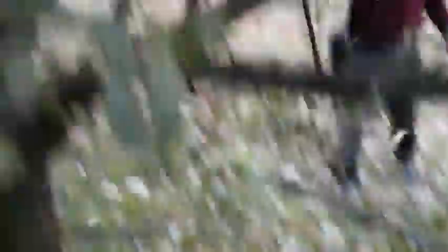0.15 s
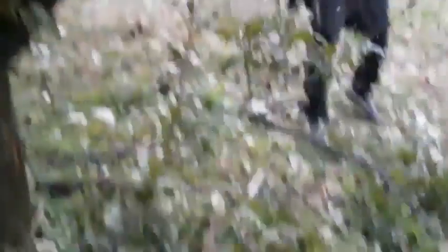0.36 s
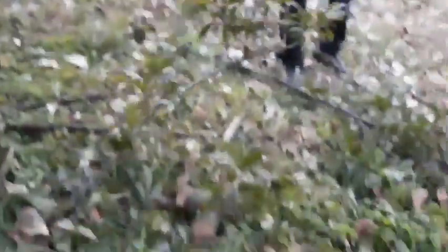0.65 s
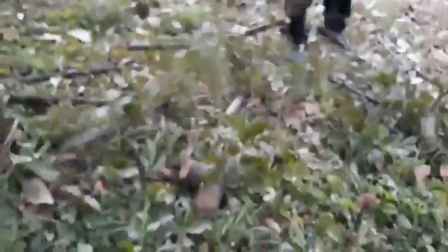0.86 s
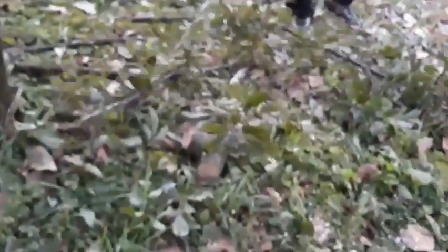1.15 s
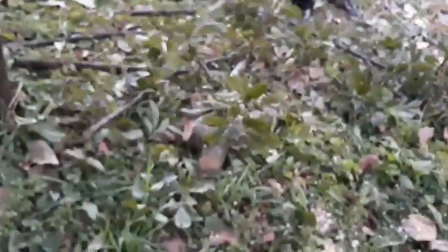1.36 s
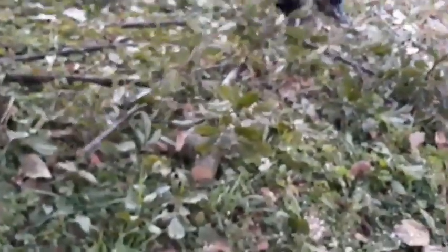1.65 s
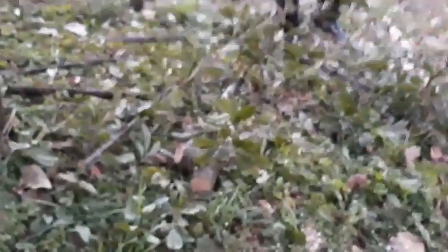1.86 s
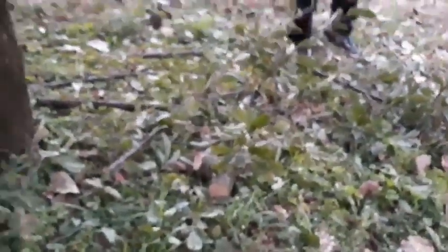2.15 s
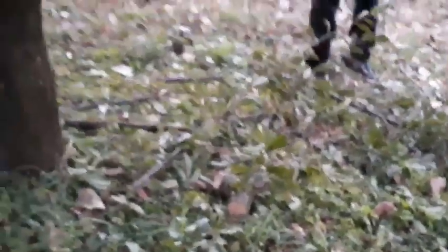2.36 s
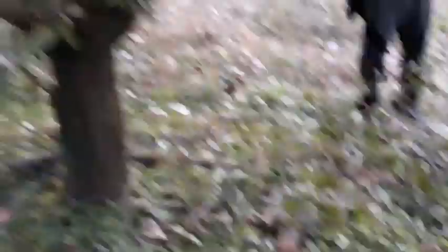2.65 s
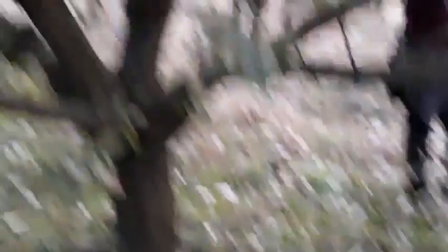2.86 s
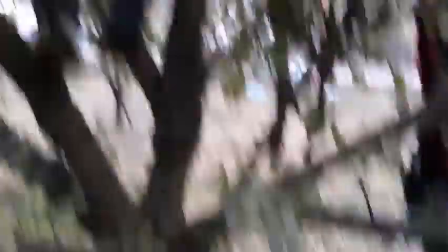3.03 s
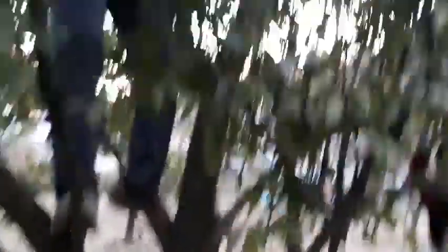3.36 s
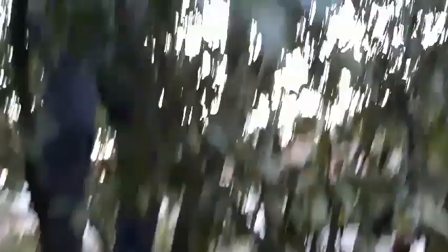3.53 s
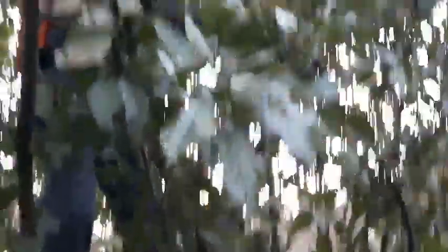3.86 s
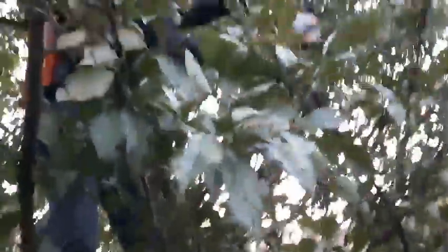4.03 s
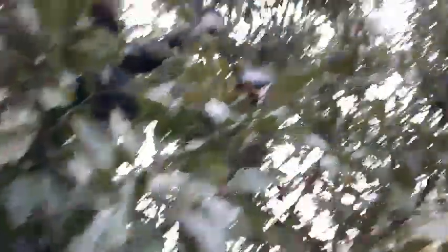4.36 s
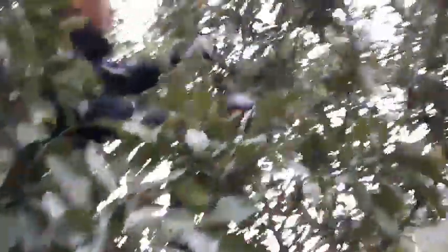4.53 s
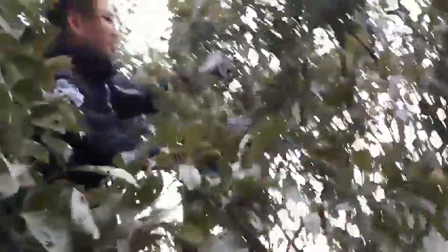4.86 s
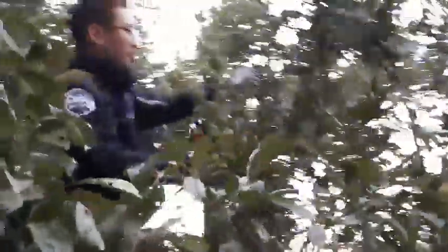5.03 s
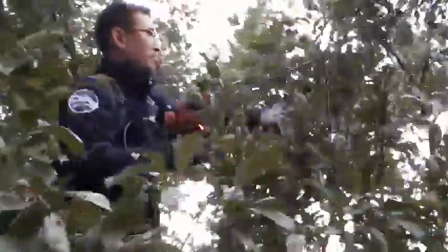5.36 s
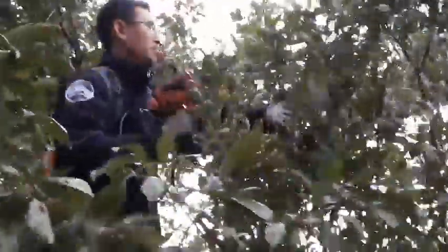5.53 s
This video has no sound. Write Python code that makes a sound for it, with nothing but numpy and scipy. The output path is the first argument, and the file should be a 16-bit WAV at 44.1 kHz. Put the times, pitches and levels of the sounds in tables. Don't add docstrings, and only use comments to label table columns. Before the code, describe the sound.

Two runs of a small battery-type chain saw outdoors, heard through a phone with centred, mono sound. Each begins with a hard trigger clack and climbing gear whine, roughens into tearing wood, then runs free and drops in pitch to a brake clack. Between them come leaf rustle, dry twig snaps, dull handling thumps and soft wind with a distant engine hum.

```python
import sys
import numpy as np
from scipy import signal
from scipy.fft import rfft, irfft
from scipy.io import wavfile
from scipy.ndimage import uniform_filter1d

SR = 44100
rng = np.random.default_rng(int(sys.argv[2]) if len(sys.argv) > 2 else 0)


def transcribe(u):
    v = np.clip(np.atleast_2d(u).T, -1, 1)
    q = np.round(v * 32767).astype(np.int16)
    wavfile.write(sys.argv[1], SR, q)


def field_ratio(decibels):
    return 10 ** (np.asarray(decibels, dtype=float) / 20)


N = 251370
T = np.arange(N) / SR

# time in seconds, wind level in dB, engine level in dB.
FAR_LEVELS = [(0.0, -47.5, -54.5), (1.52, -50, -52), (2.19, -56, -61), (2.7, -53, -54), (3.98, -51.5, -52),
              (4.25, -53.5, -47), (5.7, -58, -49)]
# frequency in Hz, level in dB per Hz.
WIND_COLOUR = [(12, -72), (20, -51), (70, 4), (111, -4), (141, -1.5), (181, -10), (206, 0.5), (255, -8.5),
               (387, -7), (424, -7), (1500, -15), (1950, -50.5), (3300, -120)]
# frequency in Hz, level in dB.
ENGINE_HUM = [(71, -69), (88, -57), (215, -60), (328, -58), (484, -63)]
# frequency in Hz, level in dB over the engine level.
ENGINE_DRONE = [(145, -4.5), (393, -4.5)]

# frequency in Hz, level in dB per Hz.
LEAF_COLOUR = [(290, -28), (500, 2.5), (943, -10.5), (1140, -8), (1260, -6.5), (1860, -6.5), (2660, 0.5),
               (5320, 4.5), (6800, 0), (8570, -4), (10200, -12.5), (14200, -3.5), (15700, -11)]
# time in seconds, rustle in dB, nearness as dB of the finest crackle over it.
LEAF_STIR = [(0.0, -41, -16), (0.136, -47.5, -11), (1.87, -42, -11), (2.266, -47.5, -9),
             (2.476, -53.5, -5.5), (2.726, -55, -4), (2.88, -52, -1), (2.93, -42, -5), (3.05, -47, -3.5),
             (3.3, -44, 0), (3.4, -40.5, -3.5), (3.5, -46, -3), (5.13, -41.5, -6), (5.32, -44, -4),
             (5.41, -48, -5), (5.445, -42, 0), (5.504, -47, -4), (5.7, -48.5, -4.5)]
# peak in seconds, swell in dB, fade in seconds.
BRANCH_SAG = (2.1, 4.2, 0.27)
DULL_SHARE, DULL_AT_DB, DULL_DB = 0.83, -53.5, -6
HOLLOW_DB = -13.5

# start in seconds, peak in dB, pitch in Hz, t60 of the rustling tail in seconds.
TWIG_TICKS = [(0.016, -38, 7000, .03), (0.028, -40, 9500, 0.034), (0.037, -28, 4500, 0.027),
              (0.057, -42, 13500, .02), (0.071, -27.5, 4620, 0.056), (0.085, -35, 6500, .03),
              (0.113, -42, 7000, .03), (0.1232, -31, 5330, .06), (1.925, -33, 5000, 0.055),
              (2.02, -31, 5060, 0.066), (2.1718, -32, 5450, .07), (2.193, -35, 1700, .06),
              (2.25, -38, 2500, .04), (2.3594, -36, 6240, .05), (2.375, -34, 4950, .07),
              (2.398, -39, 3200, .05), (2.4339, -30.5, 5800, .06), (2.5882, -41, 5590, .03),
              (2.5995, -30, 4900, 0.044), (2.6367, -34, 5140, 0.036), (2.6968, -35, 5300, 0.18),
              (2.731, -37, 2200, 0.033), (2.7905, -40, 4670, 0.066), (2.8306, -39, 5320, .04),
              (2.909, -35, 4700, .08), (2.9594, -32, 4930, .06), (3.0494, -38, 4980, .06),
              (3.065, -37, 8500, .04), (3.087, -41, 1500, .03), (3.131, -35, 4620, 0.071),
              (3.1514, -28, 5440, .08), (3.249, -24.5, 5300, 0.1), (3.29, -26, 8480, .05),
              (3.3656, -26.5, 5300, 0.096), (3.382, -31, 6000, .04), (3.39, -26, 8700, 0.17),
              (3.42, -24, 7700, 0.092), (3.606, -30, 5470, .04), (5.249, -25, 5060, 0.16),
              (5.441, -23, 3600, 0.047), (5.443, -20, 7000, 0.061), (5.628, -34, 5540, 0.055),
              (5.656, -37, 4950, .06)]
# start in seconds, peak in dB,
# pitch in Hz.
DULL_KNOCKS = [(0.065, -28, 700), (0.799, -31, 310), (2.091, -28, 480), (2.592, -29, 245),
               (2.698, -30.5, 151), (2.87, -37, 153), (3.089, -26.5, 149), (3.235, -25, 358),
               (3.251, -31, 218), (3.317, -34, 326), (3.357, -41, 215), (5.094, -26.5, 775)]
# frequency in Hz, level in dB.
MIC_COLOUR = [(300, 1), (1000, 3.5), (5000, 10), (8000, 10), (10000, -0.5), (13000, 15.5), (15700, -11)]
DELAY_S = 0.00062

# start in seconds, peak in dB, body pitch in Hz.
SWITCH_CLACKS = [(0.1445, -18, 3220), (0.149, -13, 2140), (0.157, -4, 6000), (0.163, -5.5, 1860),
                 (0.166, -20.5, 4400), (0.175, -13, 3720), (0.192, -18, 5630), (1.8325, -6.5, 6540),
                 (1.8335, -12.5, 2450), (1.8361, -9.5, 3500), (1.836, -26, 5160), (3.640, -14, 5000),
                 (3.649, -21, 3430), (3.65, -9.5, 3200), (3.6563, -5.5, 3420), (3.679, -12, 3970),
                 (5.093, -3, 3680), (5.0945, -22, 1800), (5.097, -7, 3800)]
# start in seconds, peak in dB.
HIGH_SPRING = [(0.162, -35), (0.169, -35), (0.1774, -36), (0.195, -38), (1.8367, -35), (1.8424, -35),
               (1.8534, -40), (3.6516, -25), (3.6616, -19), (3.6784, -33), (5.1004, -31), (5.1134, -32)]
# start in seconds, peak in dB.
LOW_SPRING_HITS = [
    (3.6591, -19),
    (5.0995, -22),
]
# frequency in Hz, level in dB.
BODY_COLOUR = [(300, -6.5), (800, -1), (2000, -4), (6500, -6.5), (8500, -9.5), (10000, -17), (15700, -12)]
CLACK_T60_S = 0.03
SPRING_HZ, SPRING_T60_S, LOW_SPRING_HZ, LOW_SPRING_T60_S = 12650, 0.047, 8700, 0.048

# start in seconds, peak in dB, pitch in Hz.
LINK_SLAPS = [(.8857, -15, 2300), (.9166, -15, 2420), (.9884, -13, 2260), (1.0418, -10, 2150),
              (1.066, -9, 2290), (1.0992, -9, 2320), (1.1346, -11, 2300), (1.3344, -10, 3110),
              (1.389, -10, 2240), (1.4354, -12, 2900), (1.45, -8, 3030)]
SLAP_T60_S = 0.033

# on in seconds, off in seconds.
MOTOR_RUNS = [
    (.156, 1.842),
    (3.647, 5.102),
]
# in at seconds, out at seconds, bite time in seconds.
TEETH_IN_WOOD = [
    (0.841, 1.489, 0.029),
    (4.229, 4.735, 0.107),
]
# time in seconds, gear mesh in Hz.
MOTOR_SPEEDS = [
    [(.16, 397.8), (.42, 818), (.80, 819), (.87, 793.5), (1.2, 803.6), (1.445, 796), (1.47, 850.5),
     (1.62, 831), (1.84, 400)],
    [(3.66, 299.3), (3.725, 520), (3.896, 818), (4.21, 820), (4.3, 789), (4.45, 837), (4.7, 846),
     (4.895, 821), (5.095, 392)],
]
# time in seconds, chain rattle in dB.
CHAIN_EFFORTS = [
    [(.2, -26.5), (.43, -20), (.528, -22), (.746, -21.5), (.936, -17.5), (1.446, -17), (1.654, -24),
     (1.81, -29), (1.84, -32)],
    [(3.69, -31), (3.704, -26.5), (3.876, -20.5), (3.98, -21.5), (4.2, -20.5), (4.66, -20), (4.734, -22),
     (4.97, -22.5), (5.085, -27.5)],
]
# dB over the chain rattle on reaching speed, at first touch, in the wood, after it.
LAYER_LEVELS = [
    [(-8.5, -6, -6, -8.5), (-2, 0, 2.5, -2), (-9, -7.5, -11.5, -7)],
    [(-12, -9, -6.5, -11.5), (0.5, -1, 0, -3), (0.5, 1.5, -3, -5.5)],
]
LAYER_EDGES = (130, 1200, 3200, 8900, 15700)
# frequency in Hz, level in dB per Hz.
FREE_COLOUR = [
    [(76, -55), (130, -84), (562, -16), (744, -9.5), (823, -13), (1090, -14), (1630, 6), (2290, 17.5),
     (2480, 14.5), (3030, 0.5), (5000, 5), (7470, -0.5), (9700, -22.5), (13400, -15), (15700, -25)],
    [(76, -51), (130, -22), (551, -15.5), (807, -8.5), (1310, -15.5), (1600, -7.5), (2160, -5),
     (2380, -5.5), (3280, -3.5), (5000, 8.5), (6900, 2), (8260, -1), (9900, -15), (13900, -5.5),
     (15700, -15)],
]
# frequency in Hz, level in dB per Hz.
CUT_COLOUR = [
    [(76, -52), (130, -23), (296, -27), (392, -13.5), (440, -19.5), (585, -13), (701, -9), (1110, -10),
     (2430, 3.5), (2740, -9), (4010, -7), (7630, -4), (10100, -21), (13400, -11), (15700, -21)],
    [(76, -50), (130, -12), (302, -7), (400, -4.5), (540, -11), (775, -0.5), (1160, -12), (1250, -15.5),
     (1730, -9.5), (2910, -10), (5110, 11.5), (8260, 1.5), (10100, -10.5), (13400, 0.5), (15700, -11)],
]
# frequency in Hz, width in Hz, dB over the colour.
FREE_MODES = [
    [(1880, 180, 9.5), (2620, 46, 2), (3940, 110, 4), (5100, 240, 4), (8200, 280, 1)],
    [(3710, 260, 8.5), (5450, 180, 2), (8480, 83, 5.5), (11400, 1700, 5.5)],
]
# frequency in Hz, width in Hz, dB over the colour.
CUT_MODES = [
    [(400, 26, 12.7), (708, 94, 9.3), (1420, 48, 5.4), (2160, 50, 2.1), (2950, 280, 5.2), (4014, 100, 8),
     (4950, 1800, 5.3), (6300, 310, 4.3), (6900, 60, 2)],
    [(398, 20, 10), (740, 140, 4.9), (1150, 34, 11), (1850, 54, 5.2), (2460, 46, 4.1), (3720, 55, 2.6),
     (4570, 110, 0.67), (5650, 190, 3.8), (7750, 690, 2.9)],
]
# frequency in Hz, width in Hz, dB over the colour.
COAST_MODES = [
    [(1910, 230, 8), (2540, 60, 10), (4100, 65, 6.5), (4500, 140, 1), (5530, 35, 1), (7000, 44, -6),
     (7700, 73, 3)],
    [(4556, 52, -3), (5400, 52, 8.5), (5830, 41, 6), (6560, 140, 4), (7800, 130, 7), (11700, 1500, 4)],
]
# time in seconds, mesh in dB, 2nd in dB, 3rd in dB, high multiples in dB.
GEAR_TONES = [
    [(.42, -31, -31, -24.5, -28.5), (.5, -30, -29.5, -26.5, -29), (.64, -31.5, -34, -31.5, -35.5),
     (.8, -32, -39, -25.5, -44), (.84, -42, -34, -27, -31), (1.0, -33.5, -36, -25.5, -32),
     (1.44, -36.5, -38, -27, -30), (1.47, -30, -36, -35, -46), (1.62, -34, -31, -25.5, -27)],
    [(3.9, -35, -25.5, -28.5, -35.5), (4.09, -52, -32.5, -29.5, -40), (4.13, -42, -31, -38, -41),
     (4.22, -36, -30, -45, -40), (4.25, -39.5, -37, -30, -38), (4.68, -43, -36, -40, -35),
     (4.72, -38, -43, -41, -41), (4.8, -41.5, -49, -40, -32), (4.88, -37, -44, -31.5, -36)],
]
# multiple of the mesh, level in dB.
HIGH_MULTIPLES = [
    [(5, -9), (5.5, -5), (6, 4), (7, -23), (8, -7), (9, -8)],
    [(4.5, -23), (5.5, -1), (6, 7), (7, 2.5), (8, -1), (10, -14)],
]
# multiple, dB at full speed.
PULL_HALF = [
    (2.5, -33.5),
    (2.5, -33.5),
]
# frequency in Hz, width in Hz, gain in dB, loss of the 2nd in dB, loss of the 3rd in dB.
HOUSING_SONG = [
    (630, 60, 2, 2.5, 3),
    (613, 153, 10.5, 5.5, 6.5),
]
# frequency in Hz, width in Hz, gain in dB.
GLIDE_MODES = [(480, 100, -6), (700, 96, 1.5), (1000, 83, -2), (1120, 46, 3), (1330, 38, 4),
               (1500, 77, -12), (1900, 80, 4.5), (2360, 90, 2.5)]
# time in seconds, jolt of wood and bar in dB, jolt of chain and fan in dB.
GRAIN_SNAGS = [(.884, -0.5, -3), (.961, 0, -1), (1.045, 3.5, 3), (1.145, 1, 2), (1.238, 0, 4),
               (1.283, 1.5, 1), (1.335, 0, 2.5), (1.41, 1.5, 2), (1.452, -1, -0.5), (4.275, -1, 4.5),
               (4.303, 5, 5), (4.365, -0.5, 2), (4.392, 3.5, 8.5), (4.468, 1.5, 4.5), (4.52, 1.5, 3),
               (4.55, -1, 4), (4.58, 1.5, 5.5), (4.62, 2, 3), (4.655, -0.5, 3), (4.685, 1.5, 5.5)]
SNAG_RISE_S, SNAG_FALL_S = 0.014, 0.012
SNAG_SHARES = (2.1, 1.7, 0.65, 0.6)
FULL_HZ = 820
PULL_DB_PER_OCT, COAST_DB_PER_OCT, HIGH_DB_PER_OCT, FAN_DB_PER_OCT = 15, 17.5, 21, 7.5
CHIPS_PER_S, CHIP_DB, CHIP_WOOD_DB = 260, -16.5, 1


def unit(x):
    return x / np.sqrt(np.mean(x ** 2))


def read(curve):
    s, *columns = np.transpose(curve)
    return [np.interp(T, s, c) for c in columns]


def ramp(start, stop, rise):
    return np.clip(np.minimum(T - start, stop - T) / rise, 0, 1)


def add(out, s, sound):
    i = int(s * SR)
    out[i:i + len(sound)] += sound[:N - i]


def bell(hz, centre, width):
    return np.exp(-((hz - centre) / width) ** 2)


def colour(x, spectrum, rings=(), band=(0, 1e5)):
    hz = np.arange(1, N // 2 + 2) * SR / N
    points = np.array(spectrum)
    db = np.interp(np.log(hz), np.log(points[:, 0]), points[:, 1])
    db = db + sum(g / (1 + (2 * (hz - f) / w) ** 2) for f, w, g in rings)
    edges = 1 / np.sqrt((1 + (band[0] / hz) ** 16) * (1 + (hz / band[1]) ** 16))
    return irfft(rfft(x) * field_ratio(db) * edges, N)


def walk(rate):
    k = int(SR / rate)
    held = np.repeat(rng.standard_normal(N // 20), k)[:N]
    return unit(uniform_filter1d(uniform_filter1d(held, k), k))


def grains(rate, spread_db):
    sizes = field_ratio(spread_db * rng.exponential(size=N // 4).clip(0, 5))
    held = sizes[(T * rate).astype(int)]
    return unit(rng.standard_normal(N) * uniform_filter1d(held, int(SR / rate)))


def ring(hz, t60, length=.12):
    t = T[:int(length * SR)]
    return np.sin(2 * np.pi * hz * t) * 1000. ** (-t / t60)


def crack(hz, t60, width):
    edges = np.clip([hz / (1 + width), hz * (1 + width)], 30, .45 * SR)
    t = T[:int(.12 * SR)]
    push = rng.standard_normal(len(t)) * 1000. ** (-t / t60)
    push[0] += 4.
    burst = signal.sosfilt(signal.butter(1, edges, "band", fs=SR, output="sos"), push)
    return burst / np.abs(burst).max()


def waver(lines, swing_db, drift):
    out = np.zeros(N)
    for hz, db in lines:
        turns = hz * np.cumsum(1 + drift * walk(9)) / SR
        out += field_ratio(db + swing_db * walk(5.7)) * np.sin(2 * np.pi * turns)
    return out


def patchy(x, depth_db, rate):
    thirds = 3 * np.log2(np.arange(1, N // 2 + 2) * SR / N / 250).clip(0, 6)
    spectrum = rfft(x)
    out = np.zeros(N)
    for k in range(19):
        band = irfft(spectrum * np.clip(1 - np.abs(thirds - k), 0, 1), N)
        out += band * field_ratio(depth_db * walk(rate))
    return out


def far():
    wind_db, engine_db = read(FAR_LEVELS)
    wind = unit(colour(rng.standard_normal(N), WIND_COLOUR, band=(42, 1200)))
    wind = wind * field_ratio(wind_db + 4.5 + walk(4.6))
    return wind + waver(ENGINE_HUM, 0.53, 0.027) + field_ratio(engine_db) * waver(ENGINE_DRONE, 0.46, 0.01493)


def leaves():
    db, top_db = read(LEAF_STIR)
    sag_s, sag_db, fade_s = BRANCH_SAG
    sag = sag_db * (T > sag_s) * bell(T, sag_s, fade_s)
    low_db = DULL_DB - (1 - DULL_SHARE) * (db - DULL_AT_DB) + sag
    crackle = grains(900, 1.46) * field_ratio(0.24 * walk(31.9))

    def part(lo, hi, level_db):
        return unit(colour(crackle, LEAF_COLOUR, band=(lo, hi))) * field_ratio(level_db)

    low = part(600, 2100, low_db + 2.4 * walk(22.41))
    middle = part(2100, 3900, HOLLOW_DB + 0.77 * walk(5.4))
    high = part(3900, 8000, 0.86 * walk(25.58))
    top = part(8000, 15700, top_db + 0.78 * walk(5.2))
    return field_ratio(db) * (low + middle + high + top)


def twigs():
    out = np.zeros(N)
    for s, db, hz, t60 in TWIG_TICKS:
        snap = 0.33 * ring(hz, 0.0088) + 0.24 * crack(hz, 0.007, 2.8)
        add(out, s + DELAY_S, field_ratio(db) * (snap + 0.35 * crack(hz, t60, 0.43)))
    return colour(out, MIC_COLOUR)


def knocks():
    out = np.zeros(N)
    for s, db, hz in DULL_KNOCKS:
        add(out, s, field_ratio(db) * (1.33 * ring(hz, 0.017) + 0.47 * crack(1400, 0.022, 0.38)))
    return out


def clacks():
    blows, springs = np.zeros(N), np.zeros(N)
    for s, db, hz in SWITCH_CLACKS:
        body = crack(3150, CLACK_T60_S, 1.0) + 0.46 * ring(hz, CLACK_T60_S) + 0.16 * ring(690, 0.022)
        scatter = 0.43 * crack(3300, 0.11, 0.82)
        add(blows, s + DELAY_S, field_ratio(db) * (body + scatter))
    high = (HIGH_SPRING, SPRING_HZ, SPRING_T60_S)
    low = (LOW_SPRING_HITS, LOW_SPRING_HZ, LOW_SPRING_T60_S)
    for table, hz, t60 in (high, low):
        for s, db in table:
            add(springs, s, field_ratio(db) * (crack(hz, t60, 0.0043) + 0.65 * ring(hz, 1.5 * t60)))
    return colour(blows, BODY_COLOUR) + springs


def slaps():
    out = np.zeros(N)
    for s, db, hz in LINK_SLAPS:
        add(out, s + DELAY_S, field_ratio(db) * (0.82 * ring(hz, SLAP_T60_S) + 0.49 * crack(hz, 0.008, 1.5)))
    return out


def chips():
    hit = rng.random(N) < CHIPS_PER_S / SR
    return unit(colour(hit * rng.standard_normal(N), MIC_COLOUR, band=(1500, 15700)))


def jolts():
    snags = np.array(GRAIN_SNAGS)
    since = T - snags[:, :1]
    swell = np.clip(1 + since / SNAG_RISE_S, 0, 1) * np.exp(-since.clip(0) / SNAG_FALL_S)
    low, high = snags[:, 1:].T @ swell
    return low, low, high, high


def gear_whine(hz, wood, after, mesh, housing, high_mesh, half_mesh):
    slow = np.log2(hz / FULL_HZ)
    gliding = np.clip(np.abs(np.gradient(hz)) * SR / 1500, 0, 1)
    tremble = (0.0017 + 0.002 * wood + 0.011 * gliding) * walk(150) + 0.00596 * wood * walk(25)
    turn = 2 * np.pi * np.cumsum(hz * (1 + tremble)) / SR

    *low_db, high_db = read(mesh)
    speed_loss = np.where(after, COAST_DB_PER_OCT, PULL_DB_PER_OCT) * slow
    first_db, second_db, third_db = [db + speed_loss for db in low_db]
    song_hz, song_width, song_db, second_loss, third_loss = housing
    partials = [(1, first_db + song_db * bell(hz, song_hz, song_width)),
                (2, second_db - second_loss * gliding), (3, third_db - third_loss * gliding)]
    high_db = high_db + HIGH_DB_PER_OCT * slow - 5 * wood - 12 * gliding
    partials += [(k, high_db + db + 3 * walk(45)) for k, db in high_mesh]
    half, half_db = half_mesh
    partials.append((half, half_db + 12 * slow - 9 * (1 - gliding) - 6 * after))

    out = np.zeros(N)
    for k, db in partials:
        passing = gliding * sum(g * bell(k * hz, f, w) for f, w, g in GLIDE_MODES)
        flutter = (1.5 + 1.1 * wood + 1.2 * gliding) * walk(60)
        out += field_ratio(db + passing + flutter) * np.sqrt(2) * np.sin(k * turn)
    return out


def chain_rattle(hz, wood, after, chain_db, layers, at_speed_s, touch_s,
                 free, cut, free_rings, cut_rings, coast_rings):
    def stage(row):
        before = np.interp(T, (at_speed_s, touch_s), row[:2])
        return wood * row[2] + (1 - wood) * np.where(after, row[3], before)

    wood_db, bar_db, fan_db = map(stage, layers)
    fan_db = fan_db + FAN_DB_PER_OCT * np.log2(hz / FULL_HZ)
    levels = (wood_db - 6.0, bar_db - 5.0, 0., fan_db)
    links, teeth = grains(1600, 0.63), grains(400, 0.37)
    judder = field_ratio(0.14 * walk(14) * (-2.5 + wood))
    rattle = field_ratio(chain_db + CHIP_DB + CHIP_WOOD_DB * wood) * chips()
    bands = zip(LAYER_EDGES, LAYER_EDGES[1:])
    for band, db, share, jolt_db in zip(bands, levels, SNAG_SHARES, jolts()):
        coasting = unit(colour(links, free, coast_rings, band))
        pulling = unit(colour(links, free, free_rings, band))
        running = np.where(after, coasting, pulling)
        tearing = unit(colour(teeth, cut, cut_rings, band))
        mix = np.sqrt(1 - wood) * running + np.sqrt(wood) * tearing
        rattle = rattle + field_ratio(chain_db + db + share * jolt_db) * mix
    return judder * patchy(rattle, 0.87 + 0.079 * wood, 80)


def saw(power, speed, effort, layers, mesh, housing, bite, free, cut,
        free_rings, cut_rings, coast_rings, high_mesh, half_mesh):
    (hz,), (chain_db,) = read(speed), read(effort)
    wood = ramp(*bite)
    after = T > (bite[0] + bite[1]) / 2
    gears = gear_whine(hz, wood, after, mesh, housing, high_mesh, half_mesh)
    chain = chain_rattle(hz, wood, after, chain_db, layers, speed[1][0], bite[0],
                         free, cut, free_rings, cut_rings, coast_rings)
    grab = field_ratio(0.21 * wood * walk(130))
    return ramp(*power, 0.0027) * grab * (gears + chain)


def scene():
    cuts = zip(MOTOR_RUNS, MOTOR_SPEEDS, CHAIN_EFFORTS, LAYER_LEVELS, GEAR_TONES, HOUSING_SONG, TEETH_IN_WOOD,
               FREE_COLOUR, CUT_COLOUR, FREE_MODES, CUT_MODES, COAST_MODES, HIGH_MULTIPLES, PULL_HALF)
    mono = far() + leaves() + twigs() + knocks() + clacks() + slaps()
    mono = mono + sum(saw(*cut) for cut in cuts)
    return np.array([mono, mono])


def top_cut(x):
    return signal.sosfilt(signal.butter(12, 15980, fs=SR, output="sos"), x)


def record(dry):
    rounded = np.tanh(0.54 * dry) / 0.67
    treble_cut = signal.ellip(8, .2, 60, 15900, fs=SR, output="sos")
    return top_cut(signal.sosfilt(treble_cut, rounded))


dry = scene()
out = record(dry)
transcribe(out)
```